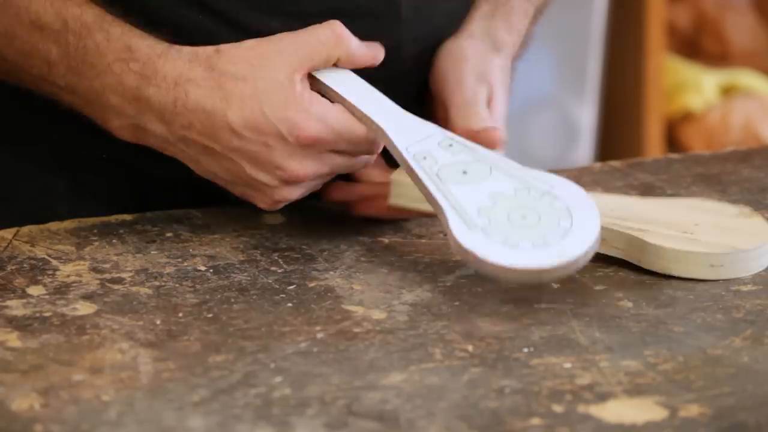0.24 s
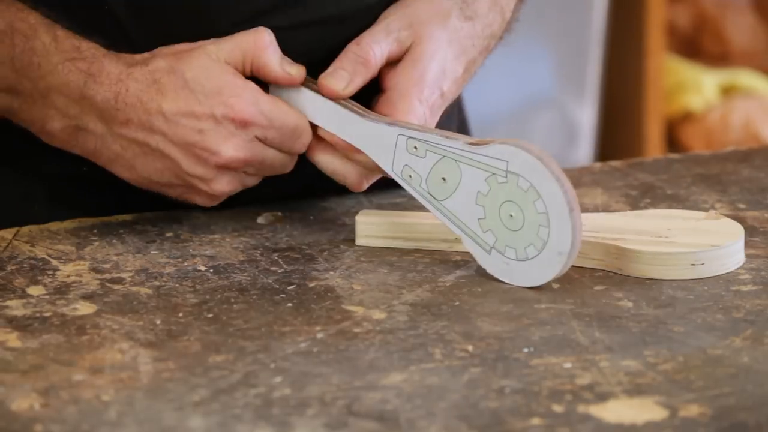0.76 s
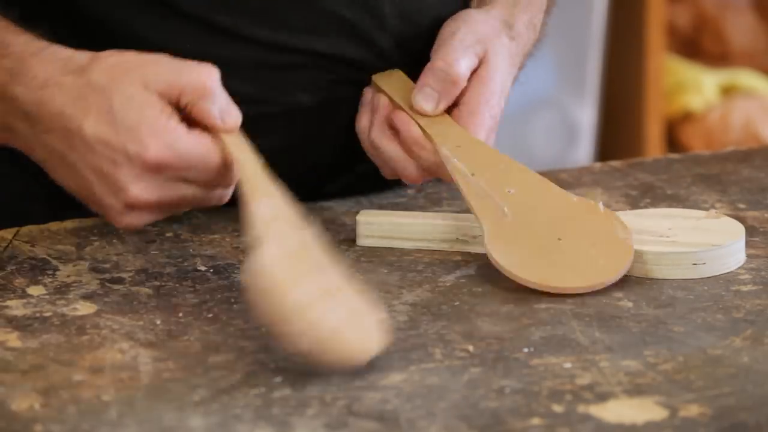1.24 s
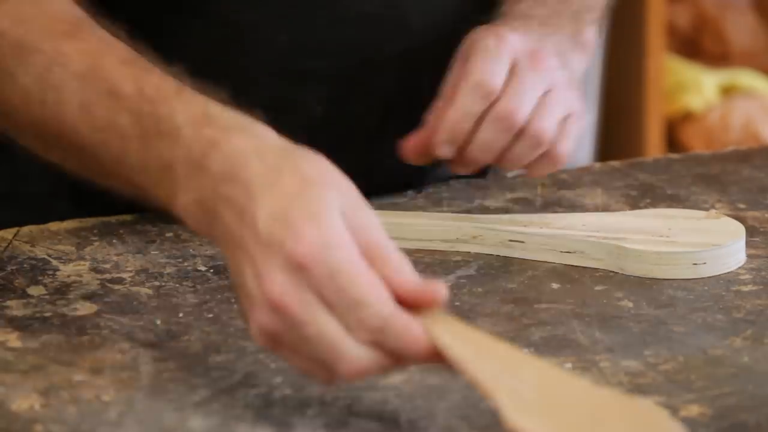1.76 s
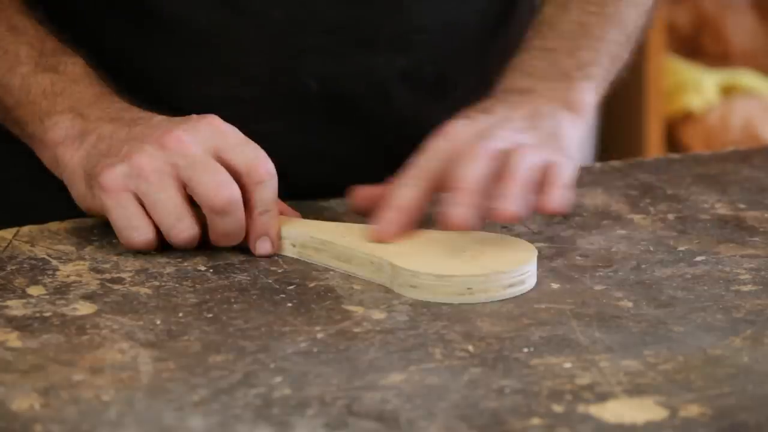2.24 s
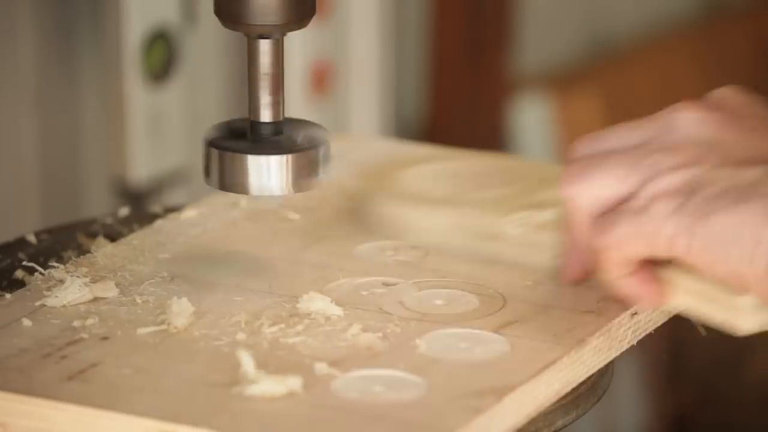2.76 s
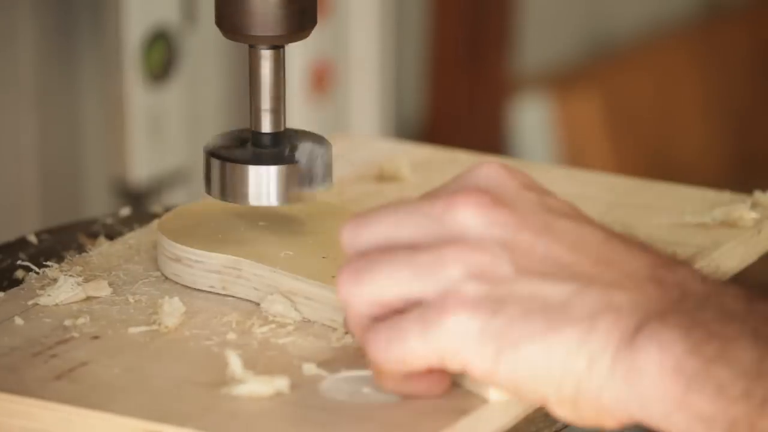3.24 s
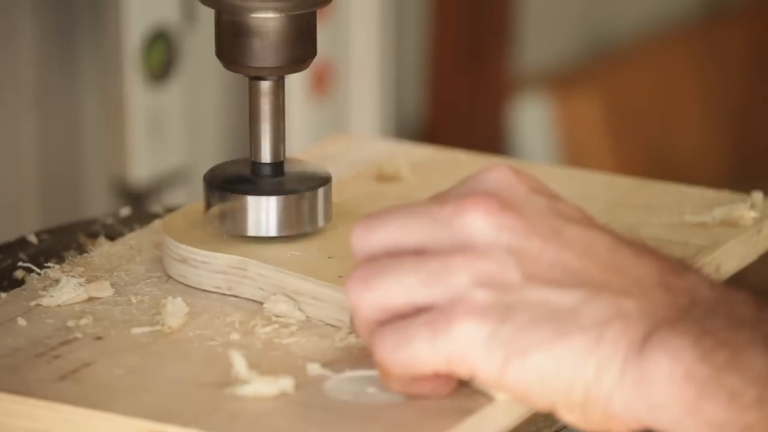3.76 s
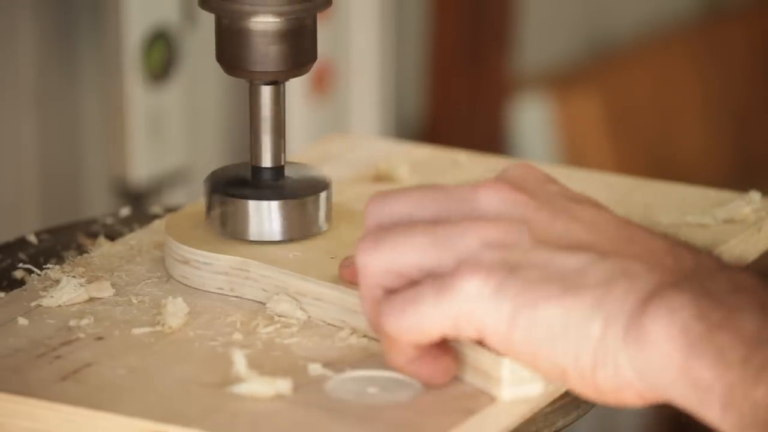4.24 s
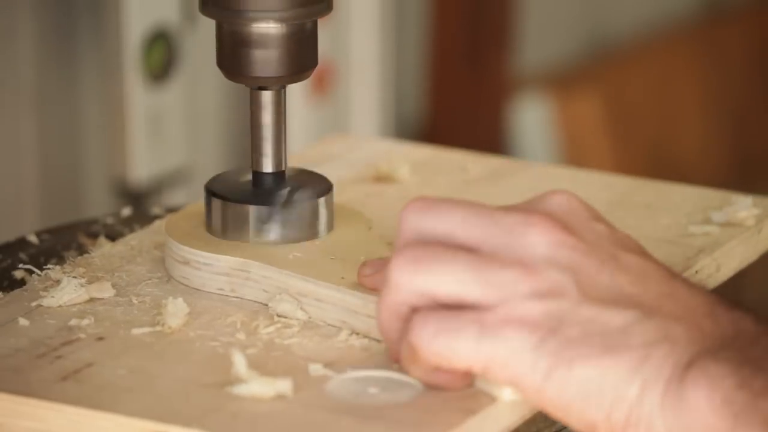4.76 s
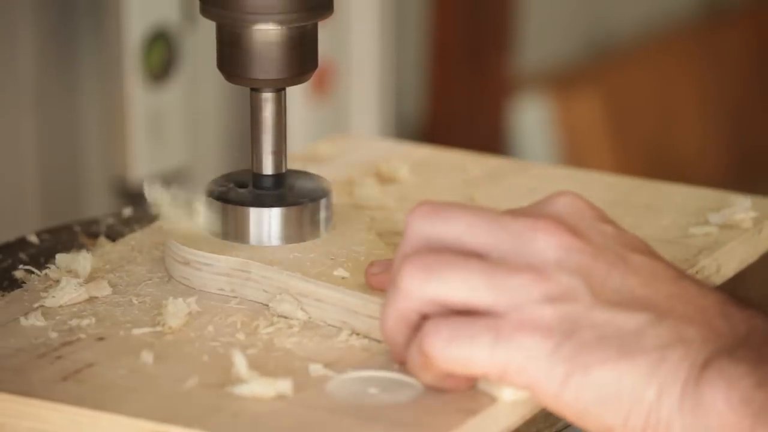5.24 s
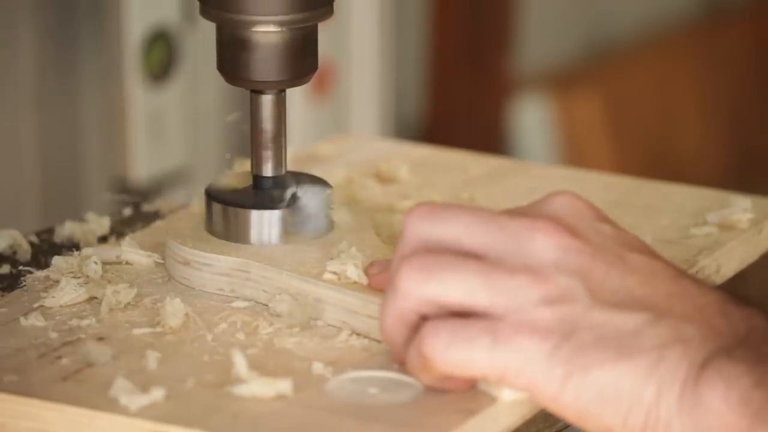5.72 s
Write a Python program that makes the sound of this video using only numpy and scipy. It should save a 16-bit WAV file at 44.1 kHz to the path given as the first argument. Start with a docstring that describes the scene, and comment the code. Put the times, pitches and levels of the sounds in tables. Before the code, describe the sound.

Sped-up workshop: small plywood pieces clack and scuff sharply, then a humming drill press abruptly takes over, its wide bit hissing into wood.

```python
"""A small workshop, one microphone near the bench, work heard at several times its natural speed.
Plywood pieces clack (noisy touches ring board modes, then short echoes) and scuff (grainy band noise)
while a far engine drones as gliding sines. From 2.4 s a drill press hums in steady and beating lines;
its wide bit bites in noise pulsed twice a turn, the board rubs and chips tear out.
From 5.9 s a faster tool whines: four sines over rough air noise."""
import sys
import numpy as np
from scipy import signal
from scipy.fft import rfft, irfft
from scipy.io import wavfile
from scipy.ndimage import uniform_filter1d

SR = 44100
rng = np.random.default_rng(int(sys.argv[2]) if len(sys.argv) > 2 else 0)


def materialize(psi):
    """Save the field psi as 16-bit PCM at rate SR to the path in sys.argv[1].

    A 1-D psi becomes a single channel; in a 2-D psi each row is a channel.
    """
    bounded = np.clip(np.atleast_2d(psi).T, -1, 1)
    quanta = np.round(bounded * 32767).astype(np.int16)
    wavfile.write(sys.argv[1], SR, quanta)


N = 264159
TIME = np.arange(N) / SR  # seconds
DRILL_START_S, TOOL_START_S = 2.391, 5.912

# Air of the shop around the bench. Each row: frequency in Hz, relative density in dB per Hz.
SHOP_AIR_SPECTRUM = [(25, -32), (150, -13), (400, -6), (770, -6.5), (1100, -7.5), (2400, -15),
                     (7100, -17.5), (15200, -17.5), (16500, -33)]
SHOP_AIR_DB = -60  # before its slow flicker
# Engine far off, four passages. Each row: time in seconds, pitch in Hz, level in dB.
ENGINE_PASSAGES = [
    [(0.0, 259, -60), (0.138, 266.5, -63), (0.38, 211, -72)],
    [(1.5, 249, -67), (1.578, 282, -65), (1.66, 249, -72)],
    [(1.78, 250.6, -71), (1.822, 246, -63), (2.05, 353, -66.5)],
    [(2.27, 345, -71), (2.304, 322, -58), (2.37, 276, -71)],
]
# Hands shifting the pieces. Each row: time in seconds, level in dB.
RUSTLE_LEVELS = [(0.0, -67), (0.42, -63), (0.75, -67), (1.71, -70), (2.25, -61), (2.39, -80)]
# Boards and fingers sliding. Each row: start in seconds, length in seconds, centre in Hz, level in dB.
SCUFFS = [(0.0, 0.062, 860, -58), (0.145, 0.02, 1780, -43), (0.215, 0.02, 1190, -57),
          (0.376, 0.07, 1150, -59), (0.44, 0.039, 12000, -63), (0.496, 0.04, 1204, -56),
          (0.57, 0.0089, 1380, -50.5), (0.848, 0.011, 6230, -65.5), (0.903, 0.018, 1370, -54.5),
          (0.902, 0.013, 5570, -57.5), (1.184, 0.052, 10800, -61), (1.261, 0.016, 11300, -43),
          (1.275, 0.028, 1530, -42.5), (1.554, 0.033, 11600, -60), (1.865, 0.022, 900, -51),
          (1.907, 0.019, 1590, -57.5), (1.908, .013, 7400, -54), (2.057, 0.017, 1620, -56),
          (2.064, .024, 7300, -58.5), (2.125, 0.015, 2160, -54), (2.156, 0.023, 1630, -40),
          (2.213, 0.032, 1470, -58.5), (2.338, .087, 12500, -63)]

# Wood on wood. Each row: start in seconds, crack peak in dB, board ring peak in dB (both before the bass
# cut and echoes), contact length in seconds, tilt of the crack in dB per octave.
KNOCKS = [(0.144, -14, -29, .0011, 11.5), (0.177, -4, -12, 0.0046, 1.5), (0.274, -20, -25, 0.0019, -6),
          (0.317, 1, -15.5, .002, 3.3), (0.325, -12, -23, 0.0014, 3), (0.585, -12.5, -21.5, 0.0077, 3.3),
          (1.261, -27, -48, .0008, 12), (1.2647, -24, -48, .0008, 11), (1.268, -15, -39, .0008, 14),
          (1.286, -7, -18.5, 0.003, 1.7), (1.312, -16, -40, 0.0047, 1.2),
          (1.389, -11.5, -27.5, 0.0037, -3.8), (1.42, -23.5, -33, .0036, -2.5),
          (1.445, -8.5, -22.5, 0.0051, 8.5), (1.558, -38, -60, .003, 8), (1.694, -24, -37, 0.0054, 0.3),
          (1.721, -23, -34, .007, 0.5), (1.846, -6, -28.5, 0.0043, 3.5), (1.863, -7.5, -26, 0.0022, 12),
          (1.981, -7, -17.5, 0.0035, 1.5), (2.141, -24, -24, .0015, -5), (2.157, -18.5, -23, 0.0014, -5.5),
          (2.277, -19, -25.5, 0.0023, -6)]
# Crack of a blow before its tilt. Each row: frequency in Hz, relative level in dB.
CRACK_SPECTRUM = [(500, -109), (1500, 11), (3500, 10.5), (6000, 6), (8500, 4.5), (12000, -1),
                  (16500, -10.5)]
# Modes of the boards. Each row: frequency in Hz, relative level in dB, 60 dB decay in seconds.
BOARD_MODES = [(670, -15, .016), (840, -11, .015), (1120, -4, .013), (1350, -4, .011), (1580, -1, .011),
               (1950, 2, .01), (2350, -1, .007), (2850, -4, .005), (3550, -2, .005), (4300, -8, .003)]
# Bench top. One row: start in seconds, frequency in Hz, level in dB, 60 dB decay in seconds.
BENCH_THUD = (.1515, 310, -31, .045)
ECHO_DB, ECHO_TREBLE_T60_S, ECHO_BASS_T60_S = -4.5, 0.092, 0.11  # level against the direct sound

# How hard the bit is fed into the wood. Each row: time in seconds, share 0-1.
FEED = [(2.6, 0.92), (2.67, 0.22), (3.9, 0.0), (4.7, 0.21), (4.73, 0.57), (4.9, 0.55), (5.08, 0.88),
        (5.9, 0.81)]
HUM_HZ = 501.6
# Motor hum. Each row: time in seconds, level in dB.
HUM_LEVELS = [(2.4, -47.5), (2.72, -48.5), (2.82, -57.5), (3.16, -56.5), (3.24, -54), (4.2, -53),
              (4.65, -49), (5.9, -49.5)]
# Motor lines at full load, before their flicker. Each row: frequency in Hz, level in dB.
LOADED_LINES = [(1022, -58.5), (1330, -57), (1356, -53), (1525, -54.5), (2329, -53.5)]
SECOND_LINE_DB = -50  # second hum line at full load
THIRD_LINE_DB, ROTOR_LINE_DB, ROTOR_LOADED_DB = -46, -45, -16  # the last is added at full load
BEAT_HZ, IN_STEP_S = 3.35, 3.6  # beat of third and rotor lines; a moment when they agree
HOUSING_DB = -51
# Unsteady whines of the drill press. Each row: mean frequency in Hz, level in dB before flicker.
DRILL_WHINES = [(250, -74), (375.5, -70), (625, -67), (750, -63.5), (1126, -65), (1169, -59.5), (1712, -57),
                (8080, -62)]
# Resonances of the frame. Each row: frequency in Hz, width in Hz, relative level in dB.
FRAME_MODES = [(1032, 13, -5), (1493, 102, -7.5), (2170, 17, -11), (2638, 133, -15), (4128, 86, -14.5),
               (8020, 215, -17.5)]
# Running noise of belt and bearings. Each row: frequency in Hz, relative density in dB per Hz.
RUNNING_SPECTRUM = [(15, -60), (25, -58), (120, -40), (273, -24), (445, -18.5), (700, -14.5), (1030, -9.5),
                    (1510, -12.5), (2000, -11), (2900, -17), (3800, -17.5), (4200, -17), (7100, -20),
                    (9500, -23.5), (14800, -42), (16500, -53)]
RUNNING_DB, FRAME_DB = -45.5, -45  # before load
RUNNING_LOADED_DB, FRAME_LOADED_DB = -2, -0.5  # added at full load: feed presses loose parts quiet
# Board scraping on the table until it sticks. Each row: stop in seconds, length in seconds, peak in dB.
RUBS = [(3.196, .05, -50), (4.003, 0.11, -45), (4.32, 0.27, -40.5), (4.714, 0.39, -44),
        (5.103, 0.035, -42.5)]
RUB_FLOOR_DB, RUB_GROW_DB, RUB_STOP_S = -52.5, 20.5, 0.011
SPINDLE_HZ = 28.7  # turns per second
EDGE_FREE_DB, EDGE_FED_DB = -60, -34  # hiss of the edge: running free, full feed
SHAVING_FREE_DB, SHAVING_FED_DB = -56, -37
# Shaving noise. Each row: frequency in Hz, relative density in dB per Hz.
SHAVING_SPECTRUM = [(3000, -47), (4200, 0.5), (6200, 0.5), (7900, 8), (9700, 5), (12500, 8), (14500, 4),
                    (16500, -11)]
# Chips torn out. Each row: start in seconds, burst level in dB before its band filter.
CHIPS = [(5.016, -23), (5.0484, -26), (5.0978, -27), (5.164, -28), (5.582, -16.5)]

# Air noise of the fast tool. Each row: frequency in Hz, relative density in dB per Hz.
TOOL_AIR_SPECTRUM = [(400, -39), (700, -19), (1200, -16.5), (2050, -3.5), (2500, -9), (3100, -2),
                     (3700, -7.5), (6800, -18), (10300, -13), (15600, -20), (16500, -35)]
TOOL_AIR_DB = -35
# Whine of the fast tool. Each row: frequency in Hz, level in dB.
TOOL_LINES = [(1001, -47), (2245, -47), (2998, -42.5), (3994, -48.5)]

HISS_DB, HISS_BASS_HZ = -64.5, 404  # broad level at the bench; top of the bass kept during the machines
TOP_HZ, STEP_HZ, STEP_DB = 16700, 15750, -28


def undb(db):
    """Decibels to amplitude."""
    return 10 ** (np.asarray(db) / 20)


def level(x, db):
    """Scale to an RMS level in dB."""
    return x * undb(db) / np.sqrt(np.mean(x ** 2))


def colour(x, points):
    """Filter by (Hz, dB) points joined on a log-frequency axis."""
    hz, db = np.transpose(points)
    log_hz = np.log(np.arange(len(x) // 2 + 1) * SR / len(x) + 1)
    return irfft(rfft(x) * undb(np.interp(log_hz, np.log(hz), db)), len(x))


def band(x, hz, width_hz):
    """One resonance, gain 1 at the centre."""
    return signal.lfilter(*signal.iirpeak(hz, hz / width_hz, SR), x)


def noise():
    """White noise for the whole scene."""
    return rng.standard_normal(N)


def walk(rate):
    """Random levels held 1 / rate s and slewed twice; spread near 1."""
    hold = int(SR / rate)
    steps = np.repeat(rng.standard_normal(N // hold + 1), hold)
    smooth = uniform_filter1d(uniform_filter1d(steps, hold), hold)
    return 1.388 * smooth[:N]


def sine(hz):
    """A sine of RMS 1 from a random phase, following a fixed or moving pitch."""
    phase = 2 * np.pi * np.cumsum(hz * np.ones(N)) / SR
    return np.sqrt(2) * np.sin(phase + rng.uniform(0, 2 * np.pi))


def fade(t, t60):
    """Exponential decay, 60 dB in t60 seconds."""
    return np.exp(-np.log(1000) * t / t60)


def add(out, s, x):
    """Lay a sound into the scene at s seconds."""
    i = int(s * SR)
    out[i:i + len(x)] += x[:len(out) - i]


def shop_air():
    """Broad noise of the room, its level flickering slowly."""
    return level(colour(noise(), SHOP_AIR_SPECTRUM), SHOP_AIR_DB) * undb(1.8 * walk(8.77))


def far_engine():
    """A distant engine changing speed: one sine gliding in pitch and level through each passage."""
    out = np.zeros(N)
    for rows in ENGINE_PASSAGES:
        s, hz, db = np.transpose(rows)
        edge = np.clip(np.minimum(TIME - s[0] + .02, s[-1] + 0.051 - TIME) / 0.03, 0, 1)
        out += edge * undb(np.interp(TIME, s, db)) * sine(np.interp(TIME, s, hz))
    return out


def rustle():
    """Hands shift the pieces: flickering noise shakes the board modes."""
    grains = noise() * undb(3.9 * walk(39.73))
    boards = sum(undb(db) * band(grains, hz, 170) for hz, db, _ in BOARD_MODES)
    return level(boards, 0) * undb(np.interp(TIME, *np.transpose(RUSTLE_LEVELS)))


def scuffs():
    """Grainy friction that swells and dies, in a broad band about its centre."""
    out = np.zeros(N)
    for s, length_s, hz, db in SCUFFS:
        t = TIME[:int(2 * length_s * SR)] / length_s  # in scuff lengths
        grit, grain = rng.standard_normal((2, SR // 5))[:, :len(t)]
        swell = np.minimum(t / 0.05, 1) * np.exp(-np.maximum(t - .7, 0) / 0.45)
        rub = grit * undb(9.3 * uniform_filter1d(grain, size=60)) * swell
        add(out, s, level(band(band(rub, hz, 0.83 * hz), hz, 1.3 * hz), db))
    return out


def shop_answer(t):
    """Direct sound, then dense echoes that lose their treble first; new random echoes at each call."""
    grit = rng.standard_normal(len(t))
    bright = signal.sosfilt(signal.butter(2, 3000, "high", fs=SR, output="sos"), grit)
    room = bright * fade(t, ECHO_TREBLE_T60_S) + (grit - bright) * fade(t, ECHO_BASS_T60_S)
    room *= np.minimum(t / 0.00063, 1)
    room *= undb(ECHO_DB) / np.sqrt(np.sum(room ** 2))
    room[0] = 1
    return room


def contact(t, touch_s):
    """Force of a blow: a hard snap, then a scatter of tiny contacts dying over touch_s."""
    grit = rng.standard_normal(len(t))
    late = np.maximum(t - .0011, 0)
    grit[np.argmax(late > 0) + np.arange(2)] = 2.5, -2.5  # the first touch is the hardest
    scatter = 0.38 * np.exp(-late / np.clip(touch_s, 3e-4, .03))
    return grit * np.where(late > 0, np.exp(-late / 0.00027) + scatter, .03)


def board_ring(t):
    """Decaying board modes; where a board is held and struck sets how strongly each one answers."""
    hz, db, t60 = np.transpose(BOARD_MODES)[:, :, None]
    place = rng.standard_normal((2, len(BOARD_MODES), 1))
    tones = np.sin(2 * np.pi * hz * (1 + .04 * place[1]) * t)
    return np.sum(undb(db + 1.5 * place[0]) * tones * fade(t, t60), axis=0)


def knocks():
    """Each contact drives a broad crack and the ring of the boards, then the shop answers."""
    out, t = np.zeros(N), TIME[:SR // 5]
    small = signal.butter(3, 720, "high", fs=SR, output="sos")  # small boards radiate no bass
    for s, crack_db, ring_db, touch_s, tilt_db in KNOCKS:
        push = contact(t, touch_s)
        crack = colour(push, [(hz, db + tilt_db * np.log2(hz / 5000)) for hz, db in CRACK_SPECTRUM])
        ring = signal.fftconvolve(push, board_ring(t))[:len(t)]
        blow = undb(crack_db) * crack / np.abs(crack).max()
        blow += undb(ring_db) * ring / np.abs(ring).max()
        add(out, s, signal.fftconvolve(signal.sosfilt(small, blow), shop_answer(t))[:len(t)])
    return out


def bench_thud():
    """The bench top sounds once: a low sine with a soft onset and a short decay."""
    out, t = np.zeros(N), TIME[:SR // 5]
    s, hz, db, t60 = BENCH_THUD
    add(out, s, undb(db) * np.sin(2 * np.pi * hz * t) * fade(t, t60) * np.minimum(t / 0.0029, 1))
    return out


def motor_hum(load):
    """Magnetic hum lines, some growing with load; two close lines swell and cancel in turn."""
    hum_db = np.interp(TIME, *np.transpose(HUM_LEVELS))
    out = undb(hum_db + 0.3 * walk(30)) * sine(HUM_HZ)
    out += load * sum(undb(db + 2.6 * walk(12)) * sine(hz) for hz, db in LOADED_LINES)
    out += load * undb(SECOND_LINE_DB + 0.51 * walk(30)) * sine(2 * HUM_HZ)
    # the rotor line lies just under the third hum line, and load damps it
    slip = np.exp(-2j * np.pi * BEAT_HZ * (TIME - IN_STEP_S))
    rotor = undb(ROTOR_LINE_DB + ROTOR_LOADED_DB * load) * slip
    third = np.exp(2j * np.pi * (3 * HUM_HZ * TIME + rng.uniform()))
    beating = np.real((undb(THIRD_LINE_DB) + rotor) * third)
    return out + np.sqrt(2) * undb(0.86 * walk(40)) * beating


def running_noise(load):
    """Belt and bearings: unsteady whines, broad noise, and noise shaking the housing and frame."""
    out = level(band(noise(), 1573, 60), HOUSING_DB)
    for hz, db in DRILL_WHINES:
        out += undb(db + 2.1 * walk(30)) * sine(hz * (1 + 0.001846 * walk(12)))
    rattle = noise() * undb(1.57 * walk(80))
    frame = sum(undb(db) * band(rattle, hz, width) for hz, width, db in FRAME_MODES)
    running = level(colour(noise(), RUNNING_SPECTRUM), RUNNING_DB)
    out += running * undb(1.3 * walk(6) + RUNNING_LOADED_DB * load)
    return out + level(frame, FRAME_DB) * undb(FRAME_LOADED_DB * load)


def board_rubs():
    """The board scrapes on the table in three resonances, growing until it sticks."""
    rub = undb(RUB_FLOOR_DB)
    for s, length_s, db in RUBS:
        times = [s - length_s, s, s + RUB_STOP_S]
        growth_db = np.interp(TIME, times, [-RUB_GROW_DB, 0, -RUB_GROW_DB])
        rub = rub + undb(db + growth_db) * (TIME > times[0]) * (TIME < times[2])
    grit = noise() * undb(1.5 * walk(90))
    scrape = band(grit, 4900, 520)
    scrape += undb(-3.5) * band(grit, 5570, 620)
    scrape += undb(3.5) * band(grit, 2330, 200)
    return rub * level(scrape, 0)


def cutting(edge, shave):
    """Two cutters shave wood each turn: edge hiss and shaving noise pulse with the spindle."""
    turn = SPINDLE_HZ * TIME + 0.085 * walk(3.85)
    bite = 1 + 0.29 * np.cos(4 * np.pi * turn) + 0.027 * np.cos(2 * np.pi * turn)
    hiss = noise() * np.sqrt(bite) * undb(1.9 * walk(150))
    hiss = band(band(hiss, 14900, 2700), 14900, 2700)
    shaving = colour(noise() * bite * undb(2.37 * walk(250)), SHAVING_SPECTRUM)
    return edge * level(hiss, 0) + shave * level(shaving, 0)


def chips():
    """Chips torn out: short decaying bursts of noise high in the treble."""
    out, t = np.zeros(N), TIME[:SR // 50]
    for s, db in CHIPS:
        burst = rng.standard_normal(len(t)) * fade(t, 0.027)
        add(out, s, undb(db) * band(burst, 14000, 4500))
    return out


def drill():
    """Drill press: feed raises the cutting noise, and a harder bite makes the motor labour."""
    feed = np.clip(np.interp(TIME, *np.transpose(FEED)), 0, 1)
    edge = undb(EDGE_FREE_DB + (EDGE_FED_DB - EDGE_FREE_DB) * feed)
    shave = undb(SHAVING_FREE_DB + (SHAVING_FED_DB - SHAVING_FREE_DB) * feed)
    load = np.clip(edge / undb(-43), .08, 1)
    return motor_hum(load) + running_noise(load) + board_rubs() + cutting(edge, shave) + chips()


def tool():
    """A fast motor: whine lines over rough air noise."""
    air = level(colour(noise() * undb(1.0 * walk(90)), TOOL_AIR_SPECTRUM), TOOL_AIR_DB)
    return air + sum(undb(db) * sine(hz) for hz, db in TOOL_LINES)


def faint_hiss():
    """Faint hiss, different in each channel: broad at the bench, only its bass during the machines."""
    broad = level(np.array([colour(noise(), [(100, 4), (600, -1)]) for _ in range(2)]), HISS_DB)
    bass = signal.sosfilt(signal.butter(6, HISS_BASS_HZ, fs=SR, output="sos"), broad)
    return np.where(TIME < DRILL_START_S, broad, bass)


def scene():
    """Bench work, then the drill press, then the fast tool, alike in both channels but for hiss."""
    bench = shop_air() + far_engine() + rustle() + scuffs() + knocks() + bench_thud()
    machines = np.where(TIME < TOOL_START_S, drill(), tool())
    return np.where(TIME < DRILL_START_S, bench, machines) + faint_hiss()


def record(dry):
    """Peaks clip; the top falls in a step, then is cut."""
    clipped = np.clip(dry, -.95, .95)
    step = signal.sosfilt(signal.ellip(8, .2, -STEP_DB, STEP_HZ, fs=SR, output="sos"), clipped)
    return signal.sosfilt(signal.ellip(12, .2, 85, TOP_HZ, fs=SR, output="sos"), step)


dry = scene()
out = record(dry)
materialize(out)
```